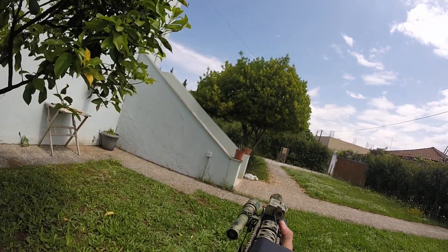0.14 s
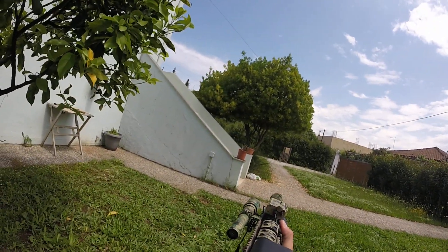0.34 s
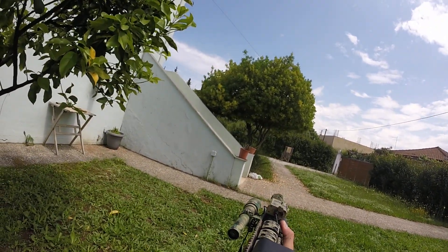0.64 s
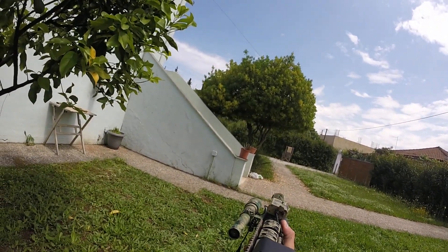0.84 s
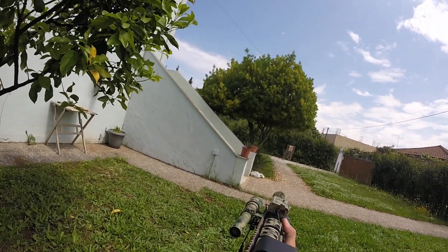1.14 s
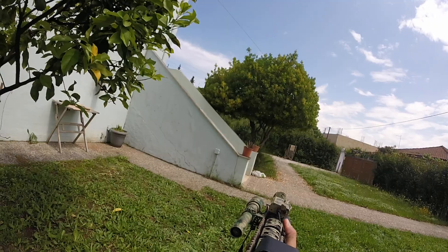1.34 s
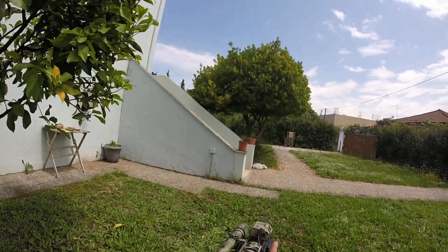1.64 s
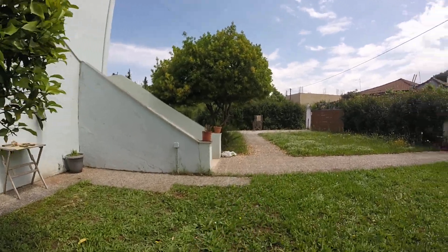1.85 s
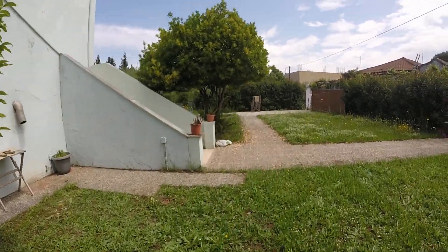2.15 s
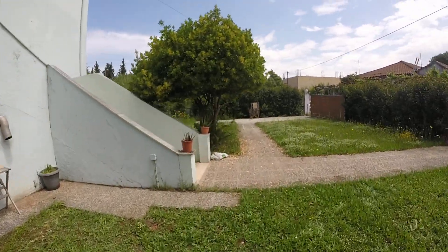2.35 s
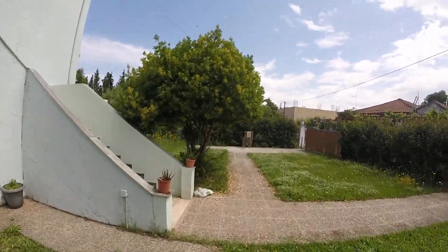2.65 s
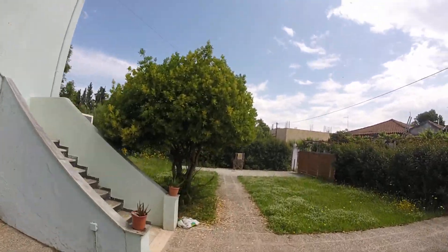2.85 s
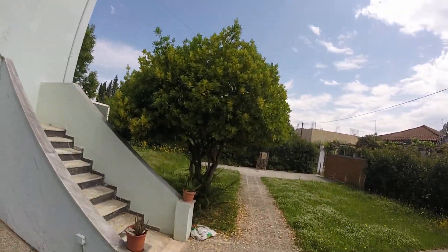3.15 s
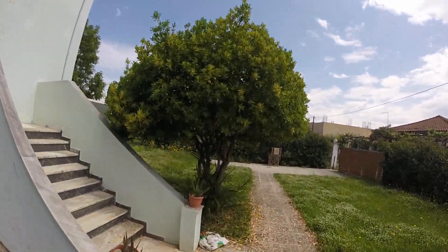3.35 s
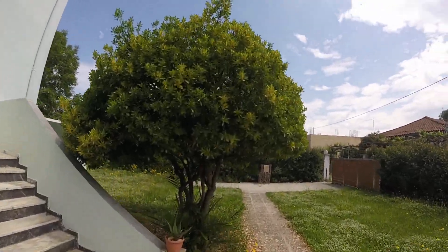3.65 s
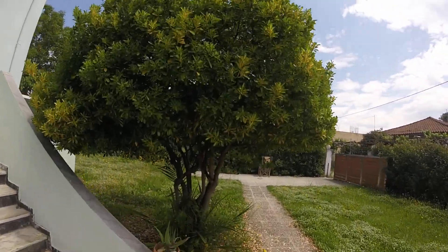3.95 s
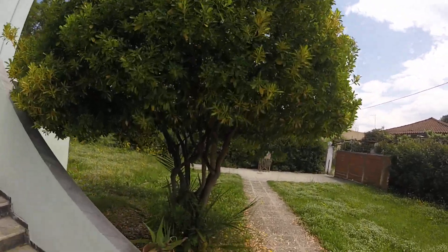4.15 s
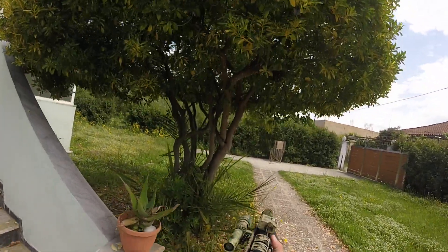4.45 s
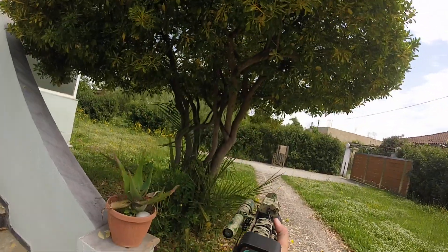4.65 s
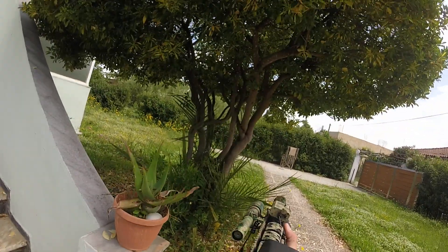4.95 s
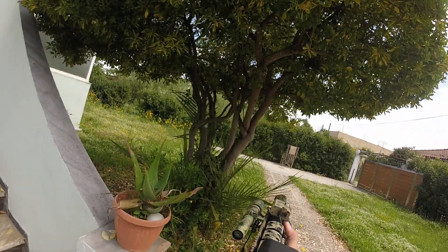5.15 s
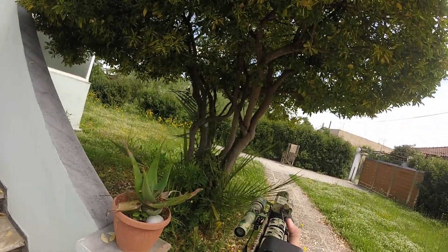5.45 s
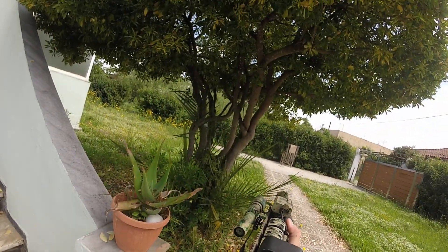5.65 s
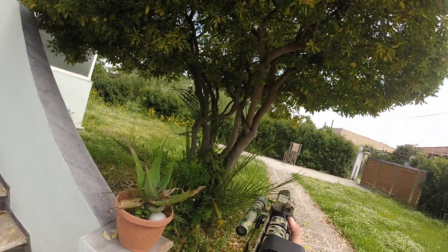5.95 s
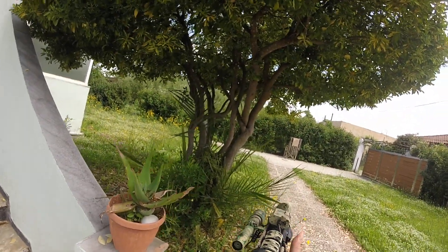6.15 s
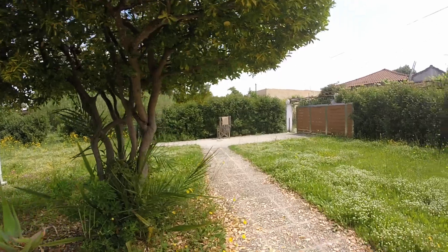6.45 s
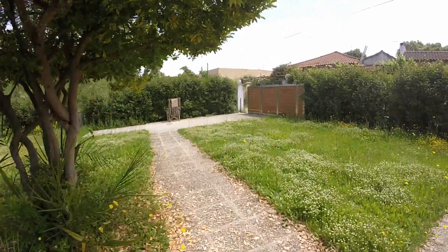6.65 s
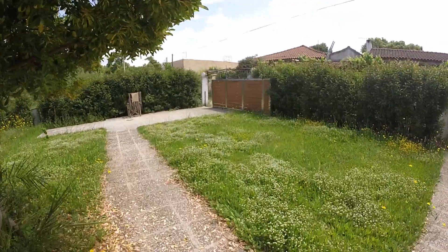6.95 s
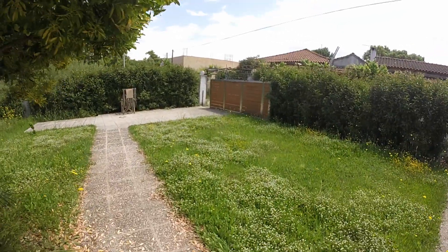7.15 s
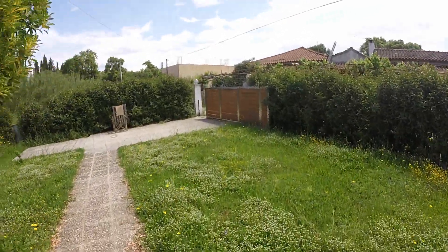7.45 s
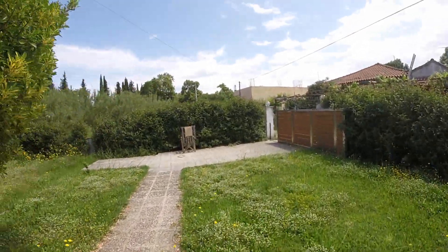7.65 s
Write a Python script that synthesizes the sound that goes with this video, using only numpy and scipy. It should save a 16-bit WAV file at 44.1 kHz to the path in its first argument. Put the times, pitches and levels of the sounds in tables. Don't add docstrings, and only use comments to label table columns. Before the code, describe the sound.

In a walled garden, wind rumbles on the microphone over a low traffic murmur. Very close, an electric air rifle whirrs through four even slams and clacks to a stop. Hands knock the hollow plastic body and a sprung catch snaps twice. A longer six-slam burst follows, then dull carrying bumps and cloth rustle fade into renewed wind. Faint birds chirp.

```python
import sys
import numpy as np
from scipy import signal
from scipy.fft import rfft, irfft
from scipy.io import wavfile
from scipy.ndimage import uniform_filter1d, minimum_filter1d

SR = 44100
rng = np.random.default_rng(int(sys.argv[2]) if len(sys.argv) > 2 else 0)


def voltage_ratio(level):
    return 10 ** (np.asarray(level, float) / 20)


def inscribe(sig):
    pcm = np.round(np.clip(np.atleast_2d(sig).T, -1, 1) * 32767)
    wavfile.write(sys.argv[1], SR, pcm.astype(np.int16))


N = 344362

# time in seconds, level in dB.
TOWN_LEVEL = [(0, -45.5), (1.0, -47), (2.6, -48), (3.05, -45), (4.9, -49), (5.6, -48), (7.0, -45.5),
              (7.81, -46)]
# frequency in Hz, density in dB per Hz.
TOWN_COLOUR = [(88, -41.5), (150, -4.5), (182, -2.5), (248, -7), (296, -9), (326, -7), (445, -10.5),
               (656, -10), (894, -8), (1020, -12), (1150, -7), (2230, -24.5), (13300, -56.5),
               (15500, -56.5)]
# time in seconds, level in dB.
WIND_LEVEL = [(0, -37), (.19, -28), (.55, -29.5), (.8, -37), (1.1, -39), (1.55, -35.5), (1.9, -37),
              (2.2, -40.5), (2.7, -41), (3.2, -41), (3.8, -44), (4.6, -42.5), (5.4, -40.5), (6.3, -40),
              (7.2, -43), (7.42, -33), (7.66, -33.5), (7.81, -31)]
# time in seconds, pitch in Hz, level in dB.
PORT_FLUTTER = [(0, 53, -35), (.15, 51.8, -30), (.25, 52, -28.5), (.57, 53.5, -30.5), (.76, 56.4, -34),
                (.8, 56, -46), (.9, 55, -100)]
# peak time in seconds, level
# in dB, seconds to rise 20 dB, seconds to fall 20 dB.
BRUSHES = [(1.47, -42, .045, .36), (2.3, -57, .22, .9), (2.92, -55, .12, .4), (3.335, -46, .03, .05),
           (3.41, -56, .1, .06), (3.7, -51, .025, .05), (4.08, -61, .15, .3), (4.315, -62, .04, .07),
           (6.146, -32, .03, .06), (6.175, -40, .06, .22), (6.825, -45.5, .035, .09), (7.07, -49, .035, .2),
           (7.12, -38, .09, .04), (7.18, -54, .1, .18), (7.51, -43, .025, .2), (7.555, -41, .1, .045),
           (7.63, -50, .06, .07), (7.775, -52, .025, .04)]
# frequency in Hz, density in dB per Hz.
FIBRE_COLOUR = [(290, -39), (500, -15), (1120, -5), (2390, -18), (3740, -12), (5510, -18), (6270, -19),
                (12300, -33), (15500, -45)]
# start in seconds, length in seconds, start pitch in Hz, end pitch in Hz, level in dB.
CHIRPS = [(.46, .03, 3800, 5100, -63), (3.0, .025, 2900, 3900, -58), (3.03, .025, 3400, 5000, -56),
          (3.565, .02, 3000, 3900, -63), (3.605, .02, 3100, 4000, -62), (3.64, .016, 3200, 5300, -59),
          (3.89, .02, 4000, 5200, -64), (5.035, .03, 3300, 5200, -61), (5.14, .03, 3200, 5000, -64)]
# start in seconds, length in seconds, low edge in Hz, high edge in Hz,
# level in dB.
SCUFFS = [(1.5, .18, 5500, 13000, -54), (.91, .07, 32, 75, -36), (3.3, .09, 200, 1000, -38),
          (7.06, .14, 7000, 15000, -55), (7.5, .085, 7000, 15000, -55), (7.745, .06, 6000, 15000, -58),
          (1.58, .05, 10200, 11800, -54), (3.65, .08, 50, 130, -41), (4.72, .1, 32, 75, -38),
          (5.05, .1, 32, 75, -38), (5.57, .09, 32, 75, -36), (6.87, .08, 32, 75, -40),
          (6.8, .08, 54, 188, -41), (1.92, .05, 60, 109, -30), (2.205, .06, 503, 1800, -46.5),
          (2.55, .12, 88, 216, -37.5), (2.881, 0.073, 790, 2000, -43.5), (3.0, .17, 1180, 1230, -44),
          (3.696, .04, 150, 1180, -36.5), (4.028, .08, 100, 885, -41.5), (4.295, .045, 700, 2800, -43),
          (6.817, .035, 900, 3000, -44), (7.044, .07, 850, 2000, -35), (7.49, .05, 200, 2140, -36)]
# pulled in seconds, let go in seconds, shell level in dB, hiss level in dB.
BURSTS = [
    (1.066, 1.365, -30, -28),
    (5.586, 6.018, -28.5, -28),
]
# frequency in Hz, width in Hz, level in dB.
GEAR_SHELL = [(433, 54, -12.5), (900, 120, -3), (1160, 110, -2.5), (1494, 144, -0.5), (1800, 44, -7.5),
              (2496, 110, -8), (2826, 90, -8), (3400, 210, -14.5), (3990, 120, -14), (4480, 120, -14),
              (4650, 140, -16.5), (6180, 300, -22), (7100, 170, -23.5)]
# frequency in Hz, density in dB per Hz.
GEAR_HISS = [(250, -27), (500, -13.5), (1500, -7.5), (3000, -11), (5500, -17.5), (7600, -19), (8100, -24),
             (11000, -22.5), (13000, -29.5), (15500, -36.5)]
# seconds after the slam, level in dB.
HISS_LOAD = [(-.012, 0), (-.004, -6), (0, 3), (.004, -1), (.011, -2), (.015, 3), (.023, 1.5), (.033, -1),
             (.04, -4.5), (.047, -4), (.052, -1.5), (.058, -3)]
# seconds after the slam, level in dB.
SPRING_LOAD = [(-.012, -1), (-.004, -4), (0, 2), (.008, -1), (.016, 3), (.022, -.5), (.028, 2),
               (.033, -2.5), (.043, 1), (.048, -1.5), (.058, -1.5)]
# time in seconds, low, middle
# and high mode levels in dB.
LATCH_DROPS = [(1.0675, -45, -29, -28), (5.5885, -40, -31, -33), (1.4732, -30, -8, -10),
               (1.4941, -45, -17, -18), (1.5534, -54, -46, -34.5), (1.5822, -50, -40, -36),
               (6.1201, -24, -5, -11), (6.1368, -40, -28, -18), (6.1434, -33, -20.5, -18.5),
               (6.1708, -33, -48, -24.5)]
# frequency in Hz, level in dB, 60 dB decay in seconds.
LATCH_MODES = [(460.3, 0, 0.024), (846, 5, .03), (1190, 1.5, 0.025), (1490, 6, 0.02), (1880, -9, 0.027),
               (2600, -3, 0.012), (3530, -2, 0.012), (3990, -4.5, .02), (4370, -3.5, 0.015),
               (5200, -4, .008), (6030, 1, 0.0068), (7100, -7, .008), (8800, -9, 0.0065),
               (9700, -10, 0.0063), (10800, -6, .009), (12500, -16, .005)]
# time in seconds, peak level in dB.
SLAMS = [(1.1512, -.5), (1.2271, -1.2), (1.297, -2), (1.3665, -2.5), (5.6598, .3), (5.7386, -2.5),
         (5.809, -3), (5.8784, -4), (5.9472, -3.5), (6.016, -4.5)]
# delay from the slam in ms, frequency in Hz, sign, rise in ms.
STROKE = [(-12, 140, 1, 4.2), (-8.9, 190, -1, 1.6), (-9.4, 800, 1, .7), (-2.75, 495, 1, 1.9),
          (-1.5, 1420, -1, 1.1), (-.93, 890, 1, .95), (1.2, 445, 1, 3), (2.7, 940, 1, 1.8)]
STROKE_DB = [-18, -16, -16, -7.5, -6, -1, -20, -19]
# start in seconds, frequency in Hz, level in dB, 60 dB decay in seconds.
PINGS = [(1.522, 3810, -51, .45), (1.585, 3810, -47, .75), (1.585, 10650, -57, .45),
         (3.401, 4620, -38, .085), (3.401, 5430, -38, .08), (3.771, 4560, -40, .1), (3.771, 5430, -41, .1)]
# time in seconds, low, middle and high mode levels in dB.
HAND_KNOCKS = [(1.9937, -35, -31, -62), (2.1965, -29, -23.5, -59), (2.222, -31, -29, -55),
               (2.535, -23.5, -34, -56), (2.5668, -23, -26.5, -50), (2.6038, -44, -37, -62),
               (3.1646, -24, -24, -33.5), (3.26, -13, -11, -24), (3.2861, -16, -12, -19),
               (3.306, -24, -26, -50), (3.3118, -23, -19, -38), (3.3165, -24, -24, -46),
               (3.327, -30, -32, -42), (3.3362, -12.5, -18.5, -45), (3.348, -20, -30, -52),
               (3.362, -26, -30, -52), (3.3808, -29, -22, -42), (3.3875, -26, -26, -40),
               (3.3925, -26, -22, -42), (3.6945, -15.5, -15, -33), (3.7446, -26, -23, -46),
               (4.0925, -21.5, -32, -49), (4.1096, -15.5, -19, -42), (4.1463, -29, -38, -41),
               (4.1583, -17.5, -17, -22), (4.2031, -23, -19, -31), (4.2981, -27.5, -30, -48),
               (4.353, -24, -21, -56), (4.3997, -22.5, -29.5, -53)]
# frequency in Hz, level in dB, 60 dB decay in seconds.
BODY_MODES = [(320, 1.5, .05), (435, -7, 0.035), (564, -13, 0.028), (827, 4, 0.032), (1080, 1.5, 0.024),
              (1370, 3.5, 0.023), (1710, -7.5, 0.0075), (2000, -8.5, .015), (2310, -6, .024),
              (2670, -1, 0.02), (3024, 0, 0.019), (3400, 1, 0.019), (3900, -3, .012), (4470, -1.5, 0.017),
              (5000, -9, .01), (5620, -2.5, .018), (6270, -5.5, .012), (7030, -10, .012), (9000, -24, .01),
              (11500, -36, 0.0068)]
# time in seconds, frequency in Hz, level in dB, rise in ms.
PANELS = [(3.1646, 330, -21, 5), (3.261, 850, -19, 3), (3.2862, 380, -9, 1.8), (3.287, 3140, -29, 1.5),
          (3.287, 6500, -36, .8), (3.3362, 125, -8, 3.5), (3.3365, 1500, -24, 1.5), (3.381, 100, -16, 4),
          (3.3945, 260, -18, 2), (3.696, 880, -22, 2.5), (4.0925, 900, -30, 2.5), (4.112, 3300, -42, 2),
          (4.142, 5600, -50, 1.5), (4.1583, 900, -24, 1.2), (4.1583, 5600, -34, .6),
          (4.2035, 900, -27, 1.5), (4.2035, 3600, -37, 1), (4.3525, 400, -21, 1.8), (4.355, 2350, -45, 4),
          (4.3997, 850, -32, 2.5), (7.6305, 125, -13, 4), (2.1965, 520, -27, 1.5), (6.4261, 600, -27, 2),
          (6.79, 1100, -26, .6), (6.811, 1000, -22, .4), (6.818, 1000, -13, .4), (7.128, 310, -30, 4),
          (7.198, 310, -25, 4), (7.333, 310, -29, 5), (7.5232, 1200, -9, .35)]
# time in seconds, low, middle and high mode levels in dB.
CATCH_SNAPS = [
    (3.3994, -6, -2, 0),
    (3.4125, -14, -11, -19),
    (3.7702, -9, -2, -1),
    (3.7885, -12, -14, -14),
    (3.7975, -22, -20, -28),
]
# frequency in Hz, level in dB, 60 dB decay in seconds.
CATCH_MODES = [(345, 0, .045), (440, -3, .03), (600, -5, .02), (810, -3, .022), (1050, -4, .018),
               (1390, 0, .02), (2270, 3, .016), (2700, 3, .012), (3100, 1, .01), (3510, 0, .018),
               (4050, -6, .008), (4500, 0, .02), (5600, -6, .014), (6550, -3, .01), (7170, -6, .013),
               (9120, -23, .012), (10900, -30, .01), (13000, -44, .008)]
# time in seconds, low, middle and high mode levels in dB.
CARRY_BUMPS = [(6.3537, -48, -37.5, -60), (6.4261, -23.5, -21.5, -42), (6.4418, -29, -29.5, -54),
               (6.7898, -30, -24, -53), (6.811, -38, -28, -55), (6.818, -30, -24, -49),
               (7.1268, -34, -29, -37), (7.1794, -48, -28, -53), (7.1974, -30, -29, -51),
               (7.3318, -29, -32, -52), (7.4678, -29, -36, -49), (7.5005, -22, -20, -38),
               (7.509, -18, -18, -26), (7.5227, -26, -17, -22.5), (7.5577, -22, -20.5, -46),
               (7.6306, -22, -18.5, -40), (7.6638, -27, -37, -56)]


def rms_one(x):
    return x / np.sqrt(np.mean(x ** 2) + 1e-20)


def in_time(rows):
    s, *columns = np.transpose(rows)
    return [np.interp(np.arange(N) / SR, s, c) for c in columns]


def drift(rate):
    return 1.2 * np.interp(np.arange(N) / SR * 2 * rate, np.arange(2000), rng.standard_normal(2000))


def coloured(points):
    hz = np.maximum(np.arange(N // 2 + 1) * SR / N, 1)
    hz_at, db_at = np.transpose(points)
    density_db = np.interp(np.log(hz), np.log(hz_at), db_at, left=-90, right=-90)
    return rms_one(irfft(rfft(rng.standard_normal(N)) * voltage_ratio(density_db), N))


def band(x, low_hz, high_hz):
    return rms_one(signal.sosfilt(signal.butter(2, [low_hz, high_hz], "band", fs=SR, output="sos"), x))


def ring(drive, hz, t60):
    r, w = voltage_ratio(-60 / (t60 * SR)), 2 * np.pi * hz / SR
    return signal.lfilter([0, np.sin(w)], [1, -2 * r * np.cos(w), r * r], drive + 1e-18)


def swell(hz, rise_ms):
    t = np.arange(3000) / SR
    u = t * 1000 / rise_ms
    return u * np.exp(1 - u) * np.sin(2 * np.pi * hz * t)


def town():
    return voltage_ratio(in_time(TOWN_LEVEL)[0] + 2.5 + 0.87 * drift(4)) * coloured(TOWN_COLOUR)


def wind():
    gust_db, = in_time(WIND_LEVEL)
    deep = voltage_ratio(gust_db - 1.5 + 2.8 * drift(6.5)) * band(rng.standard_normal(N), 32, 75)
    upper_db = -47.5 + 1.75 * (gust_db + 41)
    upper = voltage_ratio(upper_db + 3.0 * drift(11)) * band(rng.standard_normal(N), 54, 188)
    hz, flutter_db = in_time(PORT_FLUTTER)
    phase = 2 * np.pi * np.cumsum(hz * (1 + 0.03 * drift(12.5))) / SR
    flutter = voltage_ratio(flutter_db + 1.1 + 1.3 * drift(10.5))
    wave = np.cos(phase) + .65 * np.cos(2 * phase) + .15 * np.cos(3 * phase)
    return (deep + upper) / (1 + 60 * flutter) + flutter * wave


def rustle(duck):
    t = np.arange(0, N, 32) / SR
    brushes = 0
    for s, level_db, rise, fall in BRUSHES:
        brushes = brushes + voltage_ratio(level_db - 20 * np.maximum((s - t) / rise, (t - s) / fall)) ** 2
    grain = voltage_ratio(2.2 * drift(60) + 1.0 * drift(15))
    floor_db = -62
    power = np.interp(np.arange(N) / SR, t, brushes) + (voltage_ratio(floor_db) * duck) ** 2
    return np.sqrt(power) * grain * coloured(FIBRE_COLOUR)


def birds():
    out = np.zeros(N)
    for s, length, start_hz, end_hz, level_db in CHIRPS:
        n, i = round(length * SR), round(s * SR)
        phase = 2 * np.pi * np.cumsum(np.linspace(start_hz, end_hz, n)) / SR
        out[i:i + n] += voltage_ratio(level_db + 2.2) * np.hanning(n) * np.sin(phase)
    return out


def scuffs():
    out, noise = np.zeros(N), rng.standard_normal((len(SCUFFS), 9000))
    for (s, length, low_hz, high_hz, level_db), hiss in zip(SCUFFS, noise):
        n, i = round(length * SR), round(s * SR)
        shape = np.sin(np.pi * np.arange(n) / n)
        out[i:i + n] += voltage_ratio(level_db) * shape * band(hiss, low_hz, high_hz)[-n:]
    return out


def motor():
    full_teeth_per_s, start_lag, spin_up_s, coast_teeth_per_s2 = 925, .6, .022, 2800
    slack_s, bite_s = .011, .012
    surge_db, surge_s = 7, .09
    hiss_power = 1.8
    coast_db_per_s, coast_s, stall_db_per_s = 140, .072, 800
    t = np.arange(N) / SR
    second = t > (BURSTS[0][1] + BURSTS[1][0]) / 2
    pulled, let_go, shell_db, hiss_db = np.array(BURSTS)[second * 1].T
    run, coast = np.maximum(t - pulled, 0), np.maximum(t - let_go, 0)
    speed = 1 - start_lag * np.exp(-run / spin_up_s)
    teeth = np.maximum(full_teeth_per_s * speed - coast_teeth_per_s2 * coast, 400)
    fall_db = coast_db_per_s * coast + stall_db_per_s * np.maximum(coast - coast_s, 0)
    fall_db = fall_db + 200 * (t < pulled)
    loaded = .1 * run + np.maximum(run - slack_s, 0)
    bite_db = 20 * np.log10(1 - np.exp(-loaded / bite_s) + 1e-9)
    shell_db = shell_db + bite_db + surge_db * np.exp(-run / surge_s) - fall_db
    return teeth, shell_db, hiss_db + hiss_power * 20 * np.log10(speed) - fall_db


def gears(jitter, rough_db, slide):
    teeth, shell_db, hiss_db = motor()
    t = np.arange(N) / SR
    slams, turn_start = np.array(SLAMS)[:, 0], HISS_LOAD[0][0]
    latest = np.clip(np.searchsorted(slams + turn_start, t) - 1, 0, len(slams) - 1)
    since = t - slams[latest]
    load = voltage_ratio(np.interp(since, *np.transpose(HISS_LOAD), left=0, right=0))
    strain = voltage_ratio(np.interp(since, *np.transpose(SPRING_LOAD), left=0, right=0))

    count = np.cumsum(teeth / SR * (1 + jitter * drift(90)))
    contacts = np.diff(np.floor(count), prepend=0) * voltage_ratio(rough_db * rng.standard_normal(N))
    drive = contacts + slide * rng.standard_normal(N)
    shell = 0
    for k, (hz, width, level_db) in enumerate(GEAR_SHELL):
        mode = width * ring(drive, hz, 2.2 / width)
        shell = shell + (-1) ** k * voltage_ratio(level_db + 3.5 * drift(22)) * mode
    shell = rms_one(shell)

    spin_up = (since < turn_start) | (since > .2)
    mesh = 2 * np.pi * np.cumsum(teeth * (1 + .015 * drift(50))) / SR
    tone = 0.43 * np.sin(mesh) + np.sin(2 * mesh) + 0.33 * np.sin(3 * mesh) + 0.33 * np.sin(4 * mesh)
    whine = voltage_ratio(-10.5 + 5.5 * spin_up + 3.0 * drift(40)) * tone
    hiss = voltage_ratio(hiss_db + 3 + 1.5 * drift(70)) * coloured(GEAR_HISS)
    return voltage_ratio(shell_db + 3.5) * (strain * shell + whine) + load * hiss


def knocks(events, modes, crunch_s, detune, crack, tilt_db, lead):
    out, t = np.zeros(N + 9000), np.arange(4400) / SR
    hz, mode_db, t60 = np.transpose(modes)[:, :, None]
    mode_db = mode_db + tilt_db * np.log2(hz / 1000)
    held = t60 < .06
    fades = voltage_ratio(mode_db - 60 * t / t60)
    fades = fades * (1 + crack * (hz > 700) * voltage_ratio(-300 * t / t60))
    group = np.searchsorted([700, 2500], hz[:, 0])
    luck = rng.standard_normal((len(events), 2, len(modes), 1))
    grit = rng.standard_normal((len(events), 3, 500))
    for (s, *level_db), (strength, shift), noise in zip(events, luck, grit):
        rings = voltage_ratio(2.2 * strength) * fades * np.sin(2 * np.pi * hz * (1 + detune * held * shift) * t)
        for k, soft in enumerate([31, 11, 4]):
            contacts = noise[k] * np.minimum(t[:500] / .0007, 1) * np.exp(-t[:500] / crunch_s[k])
            contacts = contacts + lead * (np.arange(500) == 12)
            crunch = np.convolve(contacts, np.hanning(soft))
            blow = signal.fftconvolve(rings[group == k].sum(axis=0), crunch)
            i = round(s * SR)
            out[i:i + len(blow)] += voltage_ratio(level_db[k]) * blow / np.abs(blow).max()
    no_bass = signal.butter(2, 230, "high", fs=SR, output="sos")
    return signal.sosfilt(no_bass, out[:N] + 1e-18)


def piston():
    out = np.zeros(N)
    luck = rng.standard_normal((len(SLAMS), len(STROKE), 2))
    for (s, peak_db), chance in zip(SLAMS, luck):
        for (delay, hz, sign, rise), level_db, (louder, sharper) in zip(STROKE, STROKE_DB, chance):
            height = sign * voltage_ratio(peak_db + level_db + 0.27 * louder)
            i = round((s + delay / 1000) * SR)
            out[i:][:3000] += height * swell(hz * (1 + 0.015 * sharper), rise)
    return out


def garden(x, t60, wet_db):
    t = np.arange(round(.6 * SR)) / SR
    tail = rng.standard_normal(len(t)) * voltage_ratio(-60 * t / t60) * (t > .012)
    tail = signal.lfilter([1], [1, -.25], tail)
    return x + voltage_ratio(wet_db) * signal.fftconvolve(x, tail / np.sqrt(np.sum(tail ** 2)))[:N]


def pings():
    out, t = np.zeros(N + SR), np.arange(SR // 2) / SR
    for s, hz, level_db, t60 in PINGS:
        phase = 2 * np.pi * np.cumsum(hz * (1 + .007 * drift(60)[:len(t)])) / SR
        tone = np.sin(phase) * np.minimum(t / t60 * 30, 1)
        fade = voltage_ratio(level_db + 3 + 3 * drift(25)[:len(t)] - 60 * t / t60)
        out[round(s * SR):][:len(t)] += fade * tone
    return out[:N]


def panels():
    out = np.zeros(N)
    for s, hz, level_db, rise in PANELS:
        push = 1 if hz > 200 else -1
        out[round(s * SR):][:3000] += push * voltage_ratio(level_db) * swell(hz, rise)
    return out


def ducking(close):
    from_db, share, hold_s, back_db_per_s = -16, .62, .19, 45
    hold = round(hold_s * SR) // 2 * 2 + 1
    ramp = back_db_per_s * np.arange(N) / SR
    cut_db = share * np.maximum(20 * np.log10(np.abs(close) + 1e-9) - from_db, 0)
    held_db = -minimum_filter1d(-cut_db, hold, origin=hold // 2)
    return voltage_ratio(uniform_filter1d(ramp - np.maximum.accumulate(held_db + ramp), size=200))


def scene():
    latch = knocks(LATCH_DROPS, LATCH_MODES, crunch_s=[.0015, .0025, .003],
                   detune=0.012, crack=.7, tilt_db=.1, lead=3)
    action = piston() + gears(jitter=.05, rough_db=5.5, slide=0.19) + latch
    rifle = garden(action, t60=.45, wet_db=-24.5)
    body = knocks(HAND_KNOCKS, BODY_MODES, crunch_s=[.0022, .0022, .0018],
                  detune=.045, crack=.8, tilt_db=-2.5, lead=2.5)
    catch = knocks(CATCH_SNAPS, CATCH_MODES, crunch_s=[.002, .002, .0025],
                   detune=.006, crack=.4, tilt_db=.1, lead=5)
    hands = body + panels() + catch
    carried = knocks(CARRY_BUMPS, BODY_MODES, crunch_s=[.0022, .0022, .0022],
                     detune=.07, crack=.3, tilt_db=-6.5, lead=2.5)
    duck = ducking(rifle + hands)
    near = rifle + hands + carried + pings() + rustle(duck) + scuffs()
    return (near + birds() + duck * (town() + wind()))[None]


def roll_off(x):
    return signal.sosfilt(signal.butter(12, 16270, fs=SR, output="sos"), x)


def record(dry):
    rounded = 1.3 * np.tanh(dry / 1.3)
    finished = signal.sosfilt(signal.cheby2(10, 45, 16100, fs=SR, output="sos"), rounded)
    return roll_off(finished)


dry = scene()
out = record(dry)
inscribe(out)
```